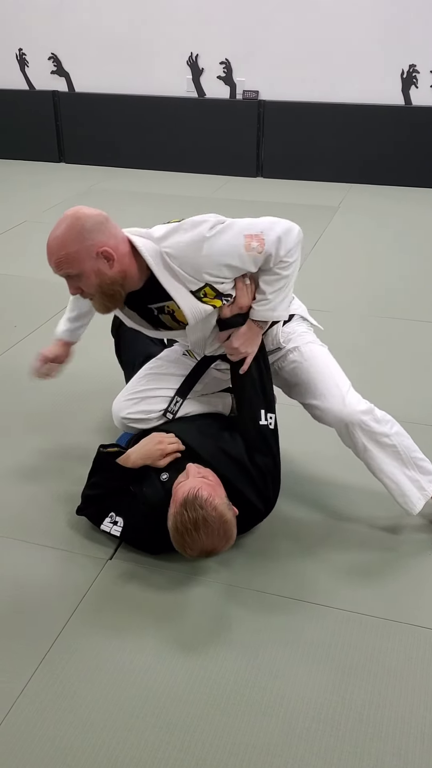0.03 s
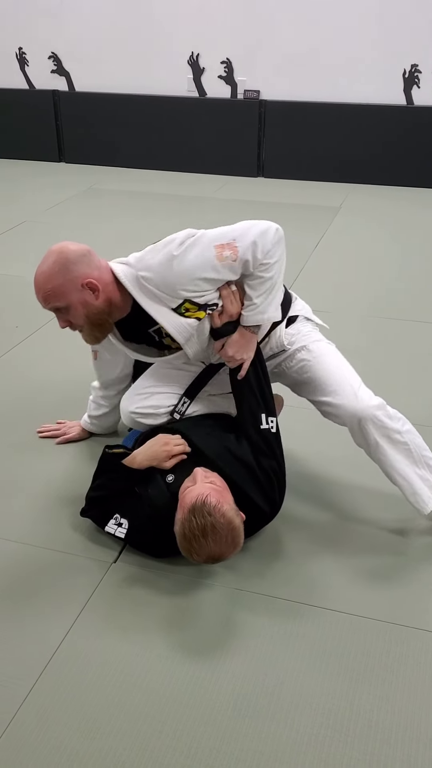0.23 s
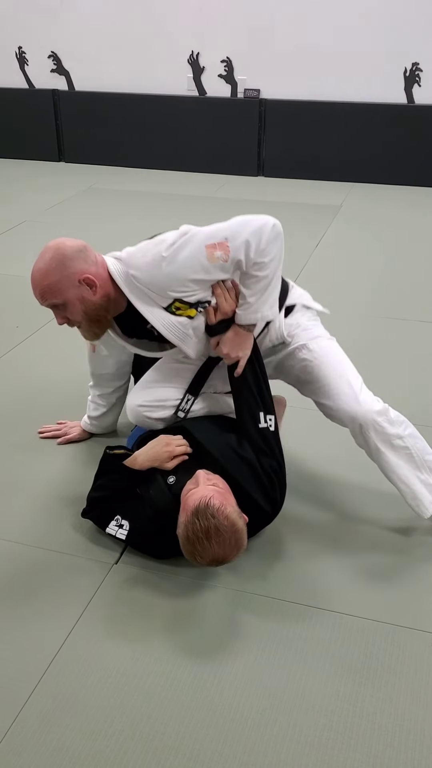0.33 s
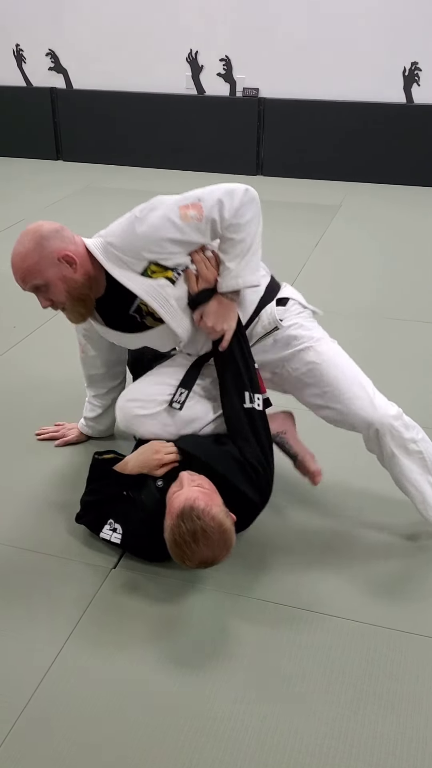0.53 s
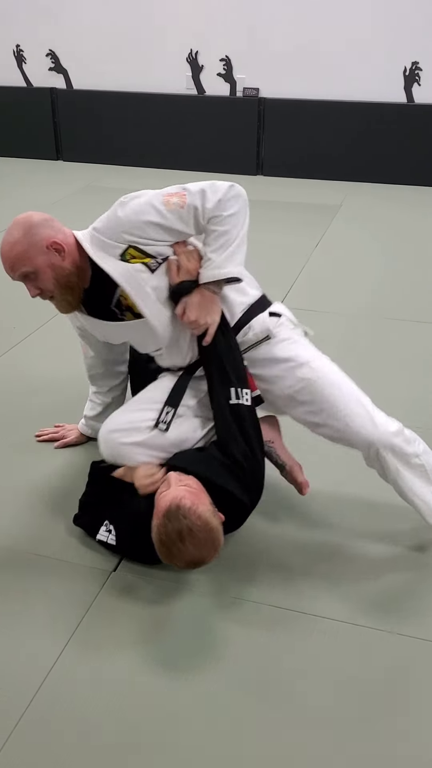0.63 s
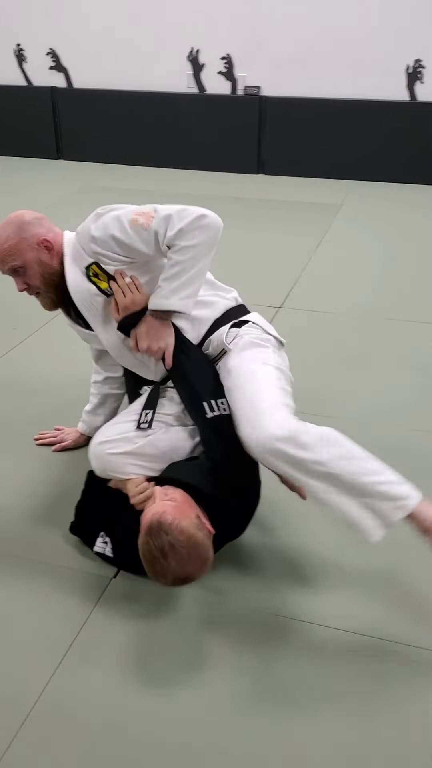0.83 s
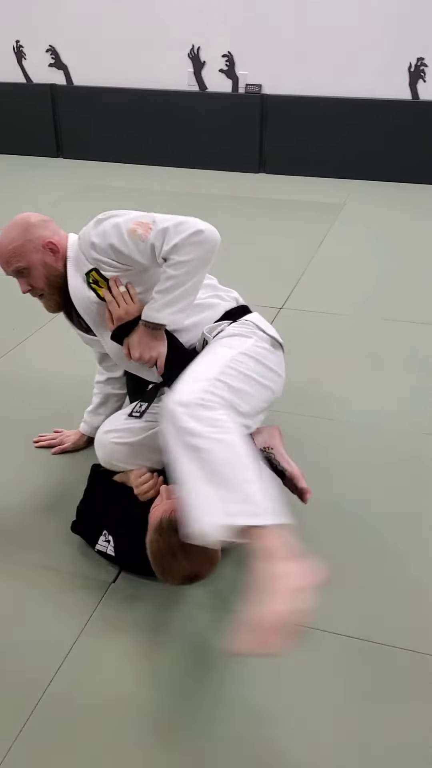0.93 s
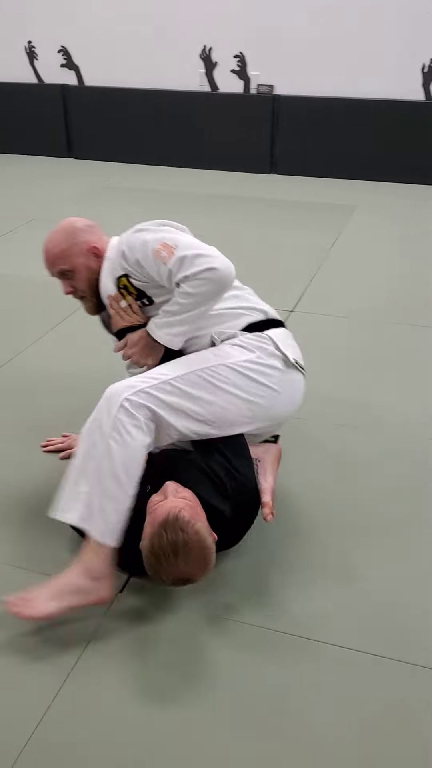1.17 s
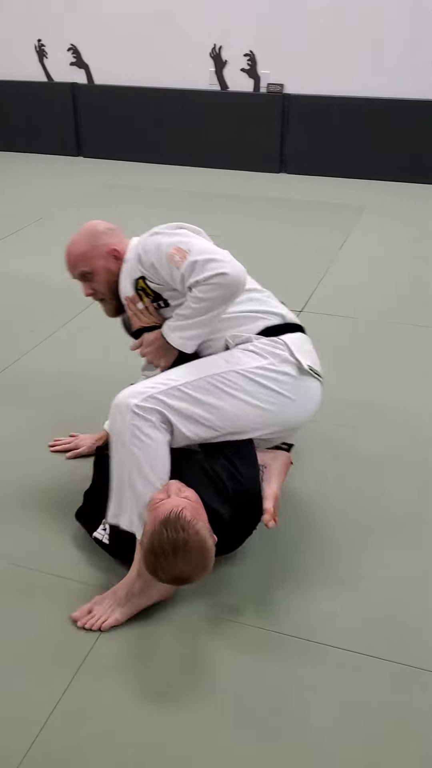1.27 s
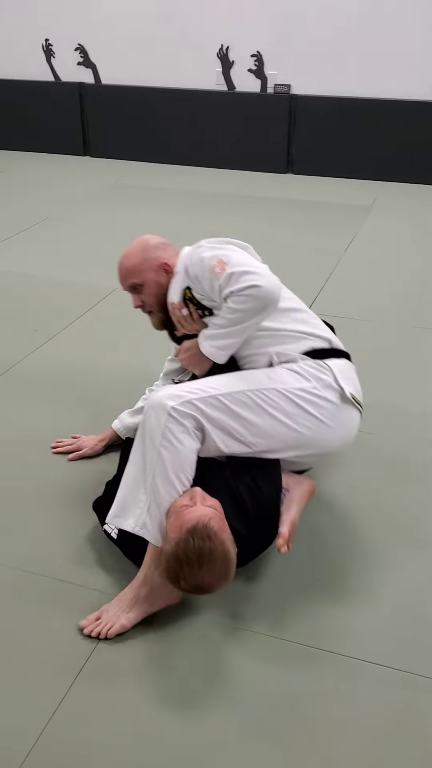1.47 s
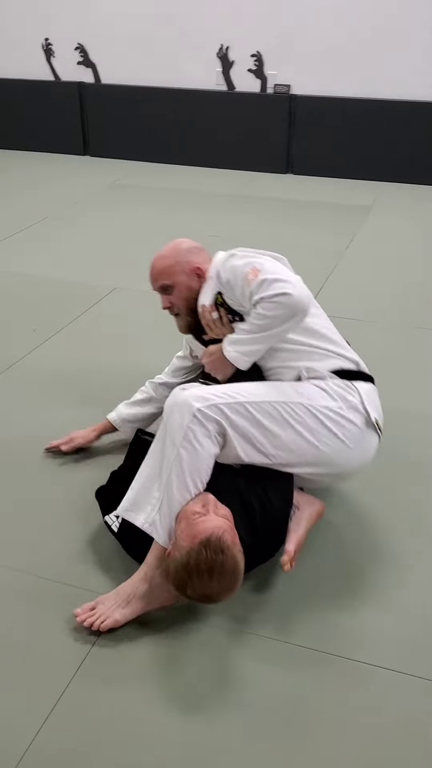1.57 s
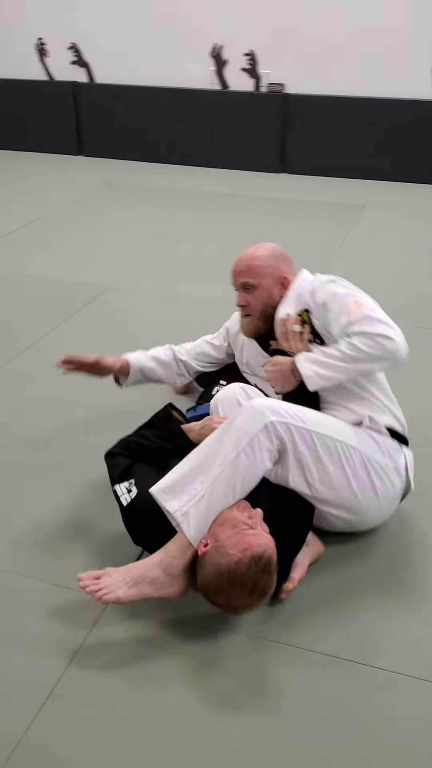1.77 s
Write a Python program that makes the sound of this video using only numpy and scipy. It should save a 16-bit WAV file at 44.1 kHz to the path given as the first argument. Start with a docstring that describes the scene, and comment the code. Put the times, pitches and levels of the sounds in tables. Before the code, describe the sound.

A hard palm slap on a padded mat booms through a hall, then soft foot landing

```python
"""Palm slap on a padded mat

A palm slaps a mat in a training hall; later a foot and a hip land softly. Cloth rustles, ticks and squeaks.
The booms and rings are fading sine waves; slap, scuffs, rustle, rub, rumble and hiss are coloured noise.
Wall echoes are delayed copies, and the hall's tail is noise that fades at its own speed at each frequency.
Two microphones stand near, so the sound is stereo."""
import sys
import numpy as np
from scipy import signal
from scipy.fft import rfft, irfft, next_fast_len
from scipy.io import wavfile
from scipy.ndimage import uniform_filter1d, map_coordinates

SR = 44100
rng = np.random.default_rng(int(sys.argv[2]) if len(sys.argv) > 2 else 0)


def level_to_linear(level):
    """Convert decibel levels to linear amplitude factors, elementwise."""
    exponent = np.asarray(level, float) / 20
    return 10 ** exponent


def persist_wave(psi):
    """Save psi, clipped to +-1, as 16-bit WAV."""
    counts = np.round(np.clip(psi, -1, 1) * 32767).astype(np.int16)
    wavfile.write(sys.argv[1], SR, np.atleast_2d(counts).T)


N = 79380  # length in samples, 1.8 s

# In all colour tables the level is per Hz and relative: the noise is scaled afterwards.
# Cloth, heavy cotton: rustle level before its wobble (t/s, level/dB) and colour (f/Hz, level/dB)
RUSTLE_LEVEL = [(0, -52), (.05, -56), (.1, -59.5), (.2, -52.5), (.42, -45.5), (.55, -50.5), (.65, -52),
                (.75, -55.5), (.84, -53.5), (.93, -54.5), (1.03, -53.5), (1.1, -54.5), (1.18, -53),
                (1.26, -56.5), (1.42, -57), (1.55, -55.5), (1.68, -54), (1.8, -53.5)]
COTTON_COLOUR = [(88, -51), (150, -50), (308, -15.5), (353, -6), (876, -2), (971, -10.5), (1620, -5.5),
                 (2670, -12), (7710, -16), (9000, -30.5), (11700, -92), (19800, -120)]
# Cloth ticks (t/s, level/dB, f/Hz, time to fade by 60 dB/cycles)
CLOTH_TICKS = [(0.011, -45, 3600, 40), (0.163, -46, 2150, 25), (0.164, -50, 780, 12), (0.83, -48, 900, 6),
               (1.278, -43, 1300, 16), (0.808, -46, 12000, 9), (0.8095, -50, 6500, 6),
               (0.819, -47, 7500, 8), (1.13, -55, 9000, 6)]
# Gliding squeaks (start t/s, length/s, from f/Hz, to f/Hz, level/dB before its wobble)
CLOTH_SQUEAKS = [(.47, .068, 1100, 2200, -48.5), (.575, .055, 750, 630, -51)]
# Ventilation rumble and treble hiss: colours (f/Hz, level/dB)
AIR_COLOUR = [(12, 26), (20, 5), (60, 12.5), (102, -0.5), (141, -6.5), (182, -11.5), (268, -7), (296, -5.5),
              (331, -6.5), (400, -8.5), (520, -49), (880, -120)]
HISS_COLOUR = [(590, -46), (1000, 2), (1370, -14.5), (2200, -2), (3270, 8.5), (4790, -84.5), (7790, -12.5),
               (9720, -3.5), (16000, -1.5)]
# Slow rise and fall of the hiss, added to HISS_DB (t/s, level/dB)
HISS_SWELL_LEVEL = [(0, -1.5), (.1, -8), (.2, 0.5), (.5, 3.5), (.7, -1), (.85, 1), (1.1, -1), (1.25, -0.5),
                    (1.45, -4.5), (1.58, -3), (1.8, 0)]
AIR_DB, HISS_DB = -45.5, -63.5
# Bodies shifting on foam: level before its wobble (t/s, level/dB) and colour (f/Hz, level/dB)
SHIFT_LEVEL = [(0, -50.5), (.06, -55.5), (.12, -61), (.2, -53.5), (.5, -61), (.63, -53.5), (.75, -68),
               (.84, -56), (.95, -66.5), (1.45, -63.5), (1.6, -54), (1.7, -53), (1.8, -52.5)]
FOAM_COLOUR = [(90, -40), (180, -2.5), (300, 2), (500, -4), (850, -3), (1200, -12), (2000, -17.5),
               (4000, -31), (8000, -120)]
# How alike left and right are in wide noise (f/Hz, likeness from -1 to 1)
LEFT_RIGHT_LIKENESS = [(60, 0.96), (180, 1), (550, -0.17), (1650, -0.039), (4970, -0.13), (15000, 0.23)]
# Blows on the mat (t/s, boom level/dB, boom f/Hz, boom rise/s, boom hold/s, knock level/dB)
MAT_BLOWS = [(0.17, -40.5, 70.5, 0.0017, 0.0044, -55.5), (0.233, -4.5, 112.5, 0.00092, 0.01323, -17.5),
             (0.644, -39, 58, 0.011, 0.017, -57.5), (0.691, -42, 63.7, 0.0067, 0.027, -60.5),
             (1.2841, -28, 296, 0.0091, 0.0018, -64), (1.286, -32.5, 88, 0.0045, 0.0087, -47.5),
             (1.573, -50.5, 285, 0.0023, 0.013, -55), (1.712, -42.5, 69.4, 0.0024, 0.031, -57.5),
             (1.7925, -28, 210, .0008, 0.0013, -38.5)]
# Bass notes of mat and hall (f/Hz, level/dB on top of the knock, time to fade by 60 dB/s)
BASS_RING = [(79.5, -1, 0.49), (102.4, -25, .35), (137, -1, .38), (173.1, -6, 0.43), (221.8, -3, 0.41),
             (248.4, -6, 0.62), (266.2, -1, 0.39), (305.2, -2, 0.346), (319.4, -6.5, 0.396),
             (351, -13.5, 0.44), (398, -19, 0.48)]
BOOM_T60_S, KNOCK_RISE_S = 0.019, 0.0058  # T60: time to fade by 60 dB
# Speed at which the hall's tail dies (f/Hz, time to fade by 60 dB/s)
HALL_FADE = [(60, .5), (300, 0.64), (900, 0.47), (2400, 0.38), (6400, 0.41), (14000, 0.33)]
HALL_GAP_S = 0.008  # silence before the tail
HALL_DB, HALL_BASS_DB = -10, -8.5  # how strongly scuffs and booms feed the hall
# The palm's slap: colour of the vinyl cover (f/Hz, level/dB)
VINYL_COLOUR = [(260, -4.5), (450, -11), (1510, -13.5), (2190, -14.5), (2470, -16), (3430, -11),
                (4560, -17.5), (7580, -17.5), (10700, -34.5), (11900, -25), (16000, -34.5)]
SLAP_S, SLAP_DB, SLAP_HOLD_S, SLAP_T60_S = 0.2288, -15.5, 0.004, 0.0047
# Air trapped under the palm
# (f/Hz, level/dB on top of CUP_DB, time to fade by 60 dB/s, left minus right level/dB)
CUP_RING = [(696, -6, 0.064, 11), (781, -6.5, 0.09, -5), (1310, 1.5, 0.031, -10), (1530, 3, 0.015, 3),
            (2146, 5.5, 0.034, 0), (3090, -8, .03, 6), (3414, -0.5, 0.037, -13)]
CUP_DB, SLAP_HALL_DB = -17, 7.5
CUP_LAG_S = 0.00014  # the left microphone hears the palm's ring later
# Echoes from single walls and the ceiling (delay/s, left level/dB, right level/dB)
WALL_ECHOES = [(.0105, -4.5, -14), (.028, -6.5, -4.5), (.046, -11.5, -11.5), (.085, -15.5, -26)]
# A sole scuffs the vinyl (t/s, level/dB before its wobble, rise/s, hold/s)
SOLE_SCUFFS = [(1.2814, -40.5, .0015, 0.024), (1.328, -52.5, 0.01, .012)]
# Colour of the scuffs (f/Hz, level/dB)
SOLE_COLOUR = [(290, -19), (500, 3), (678, -1), (974, -10), (1320, -11.5), (1720, -14.5), (2890, -4),
               (3540, -15), (7640, -12.5), (9490, -24.5), (16000, -17.5)]
SCUFF_T60_S = 0.067
MIC_LOW_HZ, TOP_HZ = 51, 16000  # microphone's bass corner, upper limit of the sound


def unit(x):
    """Scale a signal to an rms (average strength) of 1."""
    return x / np.sqrt(np.mean(x ** 2) + 1e-20)


def along(points, hz):
    """Read a (frequency, value) table at any frequency, with straight lines on a log axis."""
    f, v = np.transpose(points)
    return np.interp(np.log(hz + 1), np.log(f + 1), v)


def curve(rows):
    """Turn a (time, value) table into one value per sample."""
    s, v = np.transpose(rows)
    return np.interp(np.arange(N) / SR, s, v)


def wobble(rate):
    """A smooth random curve through `rate` random points a second."""
    return map_coordinates(rng.standard_normal(500), [np.arange(N) * rate / SR], mode="mirror")


def filtered(x, response):
    """Change the strength of each frequency by the given response."""
    m = next_fast_len(N + SR // 2)
    return irfft(rfft(x, m) * response(np.fft.rfftfreq(m, 1 / SR)), m)[..., :N]


def shape(s, rise, hold, t60):
    """Time since s, and an envelope that rises, holds and then fades by 60 dB in t60 seconds."""
    t = np.maximum(np.arange(N) / SR - s, 0)
    attack = np.minimum(t / max(rise, 1e-4), 1)
    return t, attack * level_to_linear(-60 * np.maximum(t - rise - hold, 0) / t60)


def rush(spectrum, patchy_db):
    """Wide stereo noise of rms 1: coloured, with random patches of gain in time and frequency."""
    z = signal.stft(rng.standard_normal((2, N)), nperseg=512)[2]
    field = uniform_filter1d(rng.standard_normal(z.shape[1:]), 6, 0)
    field = uniform_filter1d(field, 8, 1)
    noises = signal.istft(z * level_to_linear(patchy_db * unit(field)), nperseg=512)[1][:, :N]

    def colour_and_width(hz):
        # this angle shares the noise between mid and side to give the wanted likeness
        angle = np.arccos(np.clip(along(LEFT_RIGHT_LIKENESS, hz), -1, 1)) / 2
        return level_to_linear(along(spectrum, hz)) * [np.cos(angle), np.sin(angle)]

    mid, side = filtered(noises, colour_and_width)
    return unit(np.array([mid + side, mid - side]))


def pair(spectrum, apart):
    """Coloured noise, partly unlike at the two microphones."""
    noise = rng.standard_normal((2, N))
    common, unlike = unit(filtered(noise, lambda hz: level_to_linear(along(spectrum, hz))))
    return np.array([common + apart * unlike, common - apart * unlike]) / np.hypot(1, apart)


def cloth():
    """Rustle is noise on a changing level, ticks are short fading sines, squeaks are rough glides."""
    rustle_db = curve(RUSTLE_LEVEL) + 0.6 * wobble(12) + 0.9 * wobble(60)
    out = level_to_linear(rustle_db) * rush(COTTON_COLOUR, patchy_db=1.2)
    for s, db, hz, cycles in CLOTH_TICKS:
        t, env = shape(s, 0.0001, 0, cycles / hz)
        out += level_to_linear(db) * env * np.sin(2 * np.pi * hz * t)
    for s, length, from_hz, to_hz, db in CLOTH_SQUEAKS:
        u = np.clip((np.arange(N) / SR - s) / length, 0, 1)  # progress from 0 to 1
        phase = 2 * np.pi * length * (from_hz * u + (to_hz - from_hz) * u ** 2 / 2)
        level = level_to_linear(db + 3.5 * wobble(250)) * np.sin(np.pi * u)
        out += level * np.sin(phase + 1.6 * wobble(200))  # the shaken phase makes it rough
    return out


def background():
    """Ventilation rumble is wavering bass noise; the treble hiss is noise that slowly swells."""
    rumble = level_to_linear(AIR_DB + 1.2 * wobble(4)) * rush(AIR_COLOUR, patchy_db=0.3)
    hiss = level_to_linear(HISS_DB + curve(HISS_SWELL_LEVEL)) * rush(HISS_COLOUR, patchy_db=-0.3)
    return rumble + hiss


def shifting():
    """Bodies shift on the foam: a dull rub of noise, strongest in the low mids."""
    return level_to_linear(curve(SHIFT_LEVEL) + 0.99 * wobble(30.5)) * rush(FOAM_COLOUR, patchy_db=0.0)


def blows():
    """Each blow gives a short boom of the foam and sets the bass notes of mat and hall ringing."""
    boom, ring = np.zeros(N), np.zeros((2, N))
    flutter_db = [2.93 * wobble(25.17) for _ in BASS_RING]
    for s, boom_db, boom_hz, rise, hold, knock_db in MAT_BLOWS:
        t, env = shape(s, rise, hold, BOOM_T60_S)
        boom += level_to_linear(boom_db) * env * np.sin(2 * np.pi * boom_hz * t)
        onset = 1 - np.exp(-t / KNOCK_RISE_S)
        for k, (hz, db, t60) in enumerate(BASS_RING):
            lean = level_to_linear(2.4 * (-1) ** k * np.array([[1], [-1]]))  # notes lean left and right in turn
            level = level_to_linear(knock_db + db - 60 * t / t60 + flutter_db[k])
            ring += lean * level * onset * np.sin(2 * np.pi * hz * t)
    return boom * level_to_linear([[-0.4], [0.4]]), ring


def hall(x, alike):
    """Diffuse tail: the sound is smeared by noise in which each frequency dies at its own speed."""
    noise = rng.standard_normal((3, SR))
    share = np.clip(alike, 0, 1)  # part of the noise common to left and right
    mixed = np.sqrt(share) * noise[2] + np.sqrt(1 - share) * noise[:2]
    hz, t, z = signal.stft(mixed, SR, nperseg=512)
    fade = level_to_linear(-60 * t / along(HALL_FADE, hz)[:, None])
    tail = signal.istft(z * fade, SR, nperseg=512)[1]
    late = np.pad(x, ((0, 0), (round(HALL_GAP_S * SR), 0)))
    return signal.fftconvolve(late, tail / np.linalg.norm(tail[0]), axes=1)[:, :N]


def slap():
    """A grainy burst and the ring of cupped air; one click in the vinyl's colour drives the hall."""
    t, env = shape(SLAP_S, 0.0015, SLAP_HOLD_S, SLAP_T60_S)
    burst = level_to_linear(SLAP_DB) * env * pair(VINYL_COLOUR, apart=0.88)
    lagged = np.maximum(t - CUP_LAG_S * np.array([[1], [0]]), 0)
    cup = np.zeros((2, N))
    for hz, db, t60, pan in CUP_RING:
        level = level_to_linear(CUP_DB + db + pan * np.array([[0.5], [-0.5]]) - 60 * t / t60)
        cup += level * np.sin(-2 * np.pi * hz * lagged)
    cup *= 1 - np.exp(-t / 0.00029)  # soft start
    impulse = np.arange(N) == round(SLAP_S * SR)
    click = filtered(impulse, lambda hz: level_to_linear(along(VINYL_COLOUR, hz)))
    return burst, cup, level_to_linear(SLAP_HALL_DB) * click / np.linalg.norm(click)


def walls(x):
    """A few distinct echoes: delayed copies that swap left and right."""
    out = np.zeros((2, N))
    for delay, left_db, right_db in WALL_ECHOES:
        late = np.pad(x[::-1], ((0, 0), (round(delay * SR), 0)))[:, :N]
        out += level_to_linear([[left_db], [right_db]]) * late
    return out


def scuffs():
    """Longer, grainy bursts of noise as the foot lands and slides."""
    env = np.zeros(N)
    for s, db, rise, hold in SOLE_SCUFFS:
        env += level_to_linear(db) * shape(s, rise, hold, SCUFF_T60_S)[1]
    return env * level_to_linear(1.3 * wobble(220)) * pair(SOLE_COLOUR, apart=1.0)


def scene():
    """Add up all sources, the wall echoes and the hall's tail."""
    boom, ring = blows()
    burst, cup, click = slap()
    sole = scuffs()
    hall_drive = click * level_to_linear([[-0.5], [0.5]]) + level_to_linear(HALL_DB) * sole
    tail = hall(hall_drive, alike=0.033) + level_to_linear(HALL_BASS_DB) * hall(boom, alike=0.98)
    echoes = walls(burst + 0.21 * cup)
    direct = boom + ring + burst + cup + sole
    return direct + echoes + tail + cloth() + background() + shifting()


def band_limit(x):
    """A steep low-pass at the top of the band."""
    return signal.sosfilt(signal.butter(12, 16830, fs=SR, output="sos"), x)


def record(dry):
    """The microphones lose the deepest bass, and everything above TOP_HZ is cut off."""
    def microphone(hz):
        bass_cut = (1j * hz) ** 2 / (MIC_LOW_HZ ** 2 - hz ** 2 + 1.4j * hz * MIC_LOW_HZ)
        return (hz < TOP_HZ) * bass_cut

    finished = filtered(dry, microphone)
    return band_limit(finished)


dry = scene()
out = record(dry)
persist_wave(out)
```